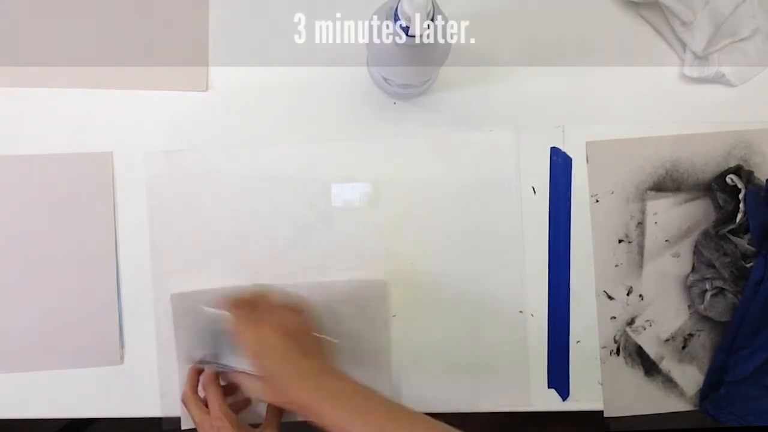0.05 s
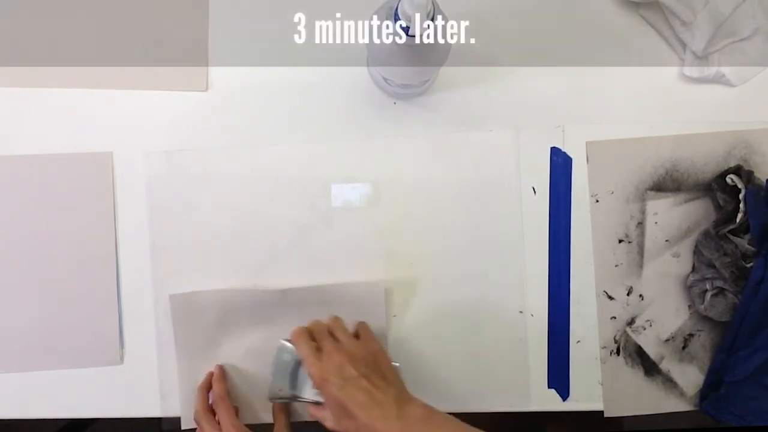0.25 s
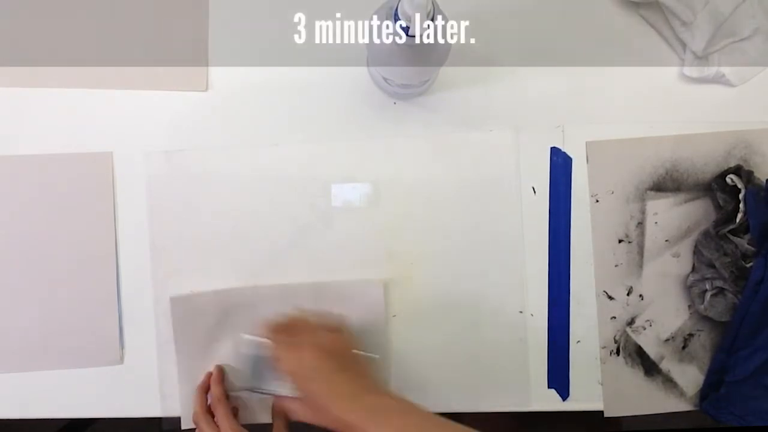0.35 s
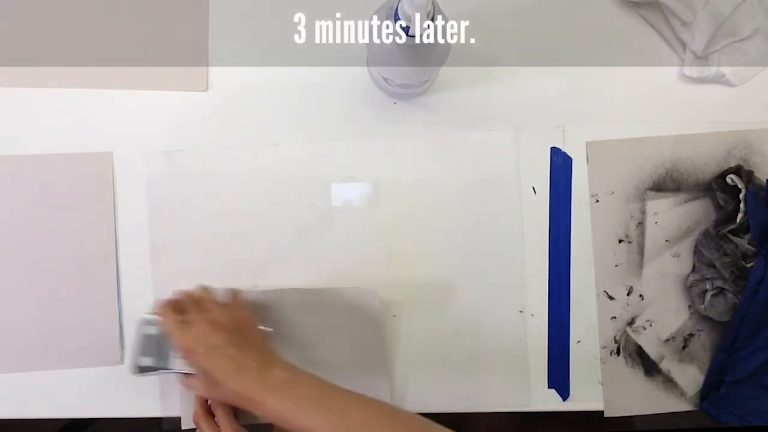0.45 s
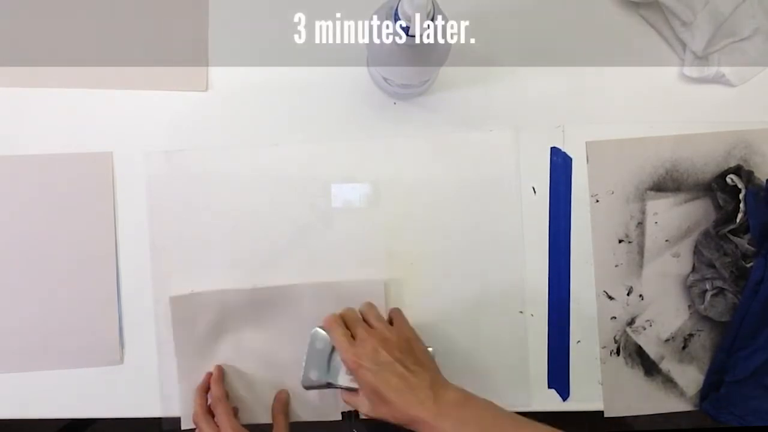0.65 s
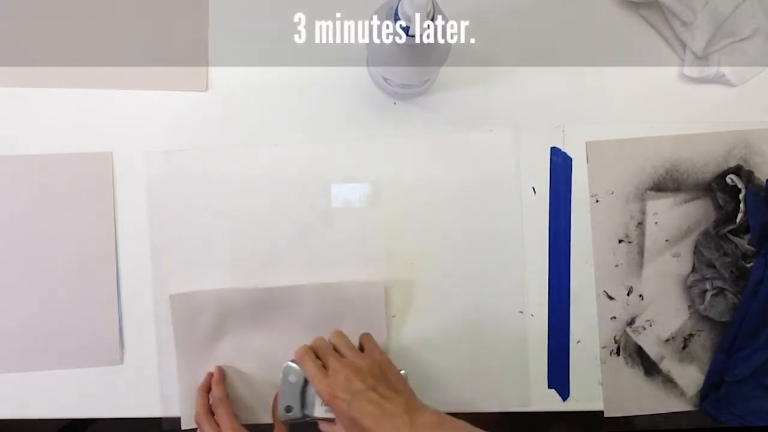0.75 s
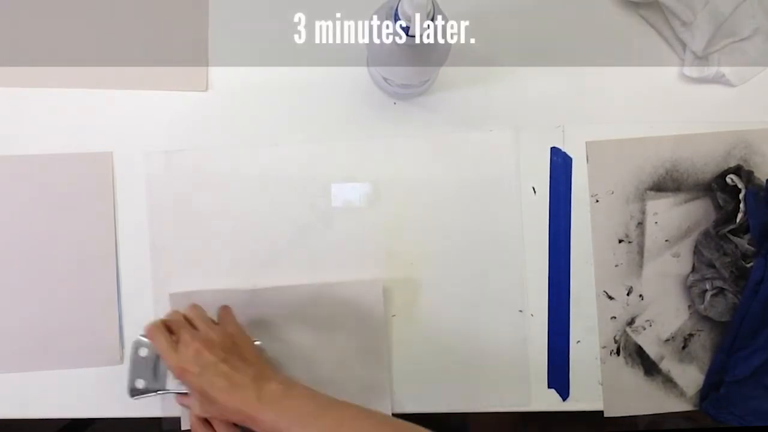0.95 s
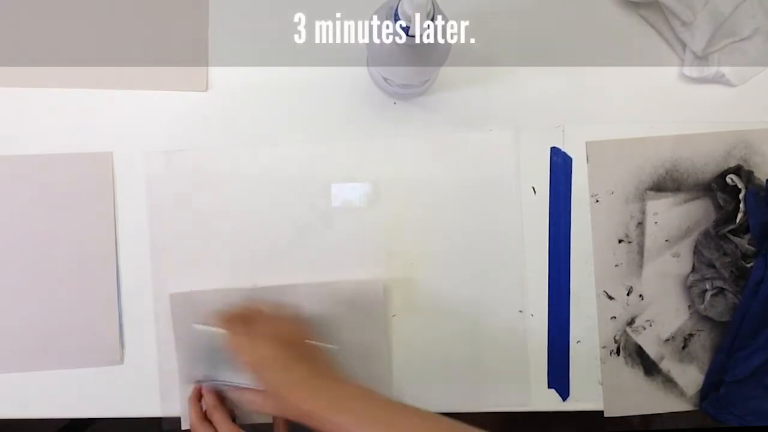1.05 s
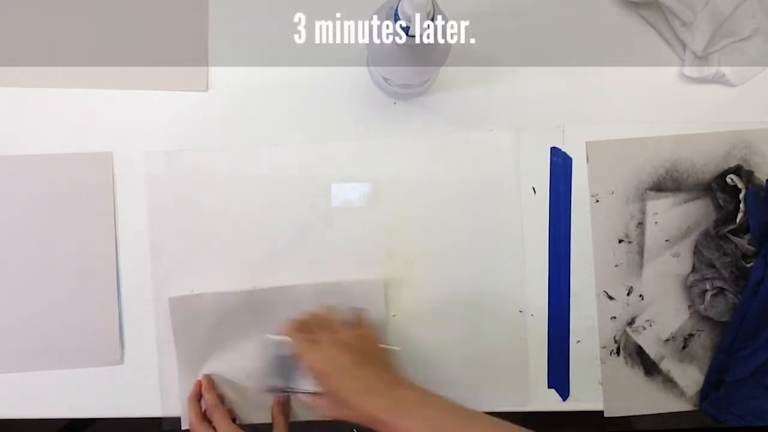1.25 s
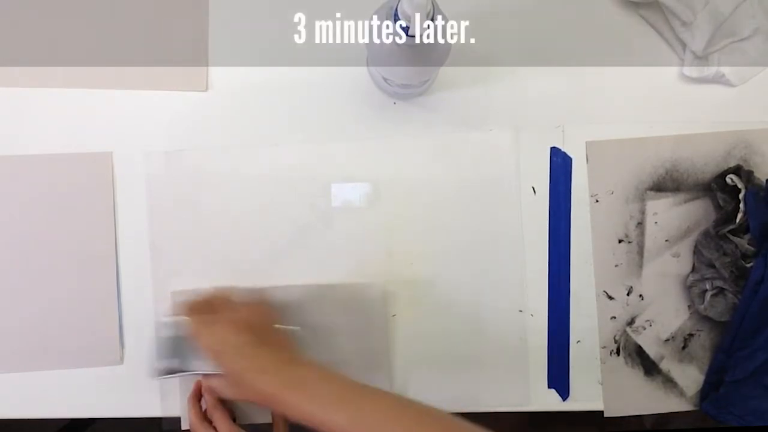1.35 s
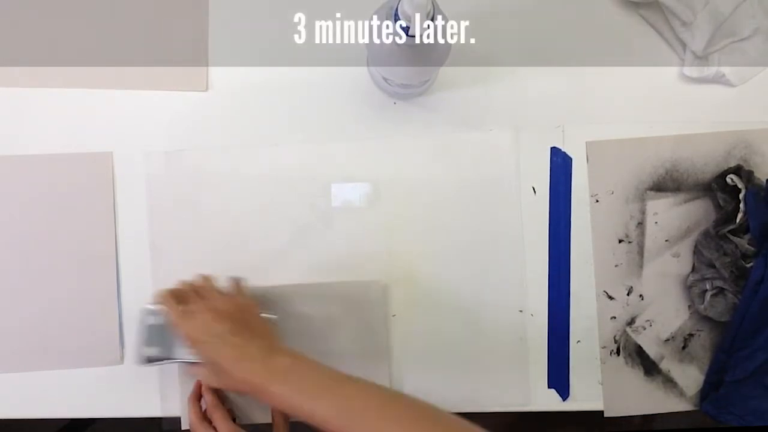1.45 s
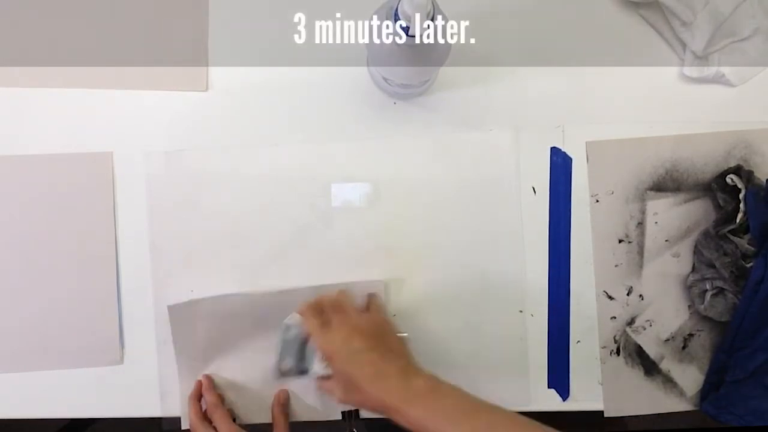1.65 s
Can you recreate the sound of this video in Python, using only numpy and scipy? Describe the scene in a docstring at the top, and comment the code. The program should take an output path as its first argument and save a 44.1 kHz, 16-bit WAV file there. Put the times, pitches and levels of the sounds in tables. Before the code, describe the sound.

A small metal roller rubs rapidly back and forth over paper, rasping and rumbling on the table. It clacks in its loose frame and thumps the table several times, heard close up in a small, dry room.

```python
"""A table in a small, fairly dry room, heard close up through one microphone.
A small metal roller is rubbed quickly back and forth over paper, about fifteen strokes a second.
Each stroke rasps on the paper and rumbles in the table top; now and then the sheet slips or crinkles.
The roller thumps the table and clacks in its loose frame. The hand rests once for a moment."""
import sys
import numpy as np
from scipy import signal
from scipy.fft import rfft, irfft, next_fast_len
from scipy.io import wavfile

SR = 44100
rng = np.random.default_rng(int(sys.argv[2]) if len(sys.argv) > 2 else 0)


def file_out(sig):
    """Save sig as 16-bit WAV at sys.argv[1]."""
    # one column per channel
    cols = np.atleast_2d(sig).T
    # limit, then scale
    lim = np.clip(cols, -1, 1)
    pcm = np.round(lim * 32767).astype(np.int16)
    wavfile.write(sys.argv[1], SR, pcm)


N = 74970
GRAIN_SPREAD_DB, CLATTER_ATTACK_S = 3, 0.00033


def amp(db):
    """Decibels to gain."""
    return 10 ** (np.asarray(db) / 20)


def unit(x):
    """x at rms 1."""
    return x / np.sqrt(np.mean(x ** 2) + 1e-20)


def along(points, hz):
    """Interpolate (frequency, value) points on a log frequency axis."""
    freqs, values = np.transpose(points)
    return np.interp(np.log(hz + 1), np.log(freqs + 1), values)


def filtered(x, response):
    """x through a frequency response."""
    size = next_fast_len(len(x) + SR // 4)
    return irfft(rfft(x, size) * response(np.fft.rfftfreq(size, 1 / SR)), size)[:len(x)]


def coloured(x, spectrum):
    """x shaped by a spectrum, at rms 1."""
    return unit(filtered(x, lambda hz: amp(along(spectrum, hz))))


def fade(t, t60):
    """Exponential decay, 60 dB down at t60."""
    return np.exp(-np.log(1000) * t / t60)


def add(out, start_s, sound):
    """Mix a sound in at start_s."""
    i = max(0, round(start_s * SR))
    out[i:i + len(sound)] += sound[:max(0, len(out) - i)]


def ring(modes, t, attack_s, vary_db=1.5, detune=.004):
    """Struck modes, a little different at each blow, with peak 1."""
    hz, db, t60 = np.transpose(modes)[:, :, None]
    level, pitch = rng.standard_normal((2, len(modes), 1))
    sines = np.sin(2 * np.pi * hz * (1 + detune * pitch) * t)
    ringing = np.sum(amp(db + vary_db * level) * fade(t, t60) * sines, axis=0)
    ringing *= 1 - np.exp(-t / attack_s)
    return ringing / np.abs(ringing).max()


def burst(spectrum, t, t60):
    """Decaying noise for many dense modes; the energy is the same at each blow."""
    envelope = fade(t, t60) * (1 - np.exp(-t / CLATTER_ATTACK_S))
    noise = coloured(rng.standard_normal(len(t)), spectrum)
    return unit(noise * envelope) * np.sqrt(np.mean(envelope ** 2))


# the quiet room's spectrum: (frequency [Hz], relative density [dB])
ROOM_TONE_SPECTRUM = [(20, -10), (100, -9), (170, -2.5), (260, 0), (420, -16.5), (1000, -17), (3000, -18.5),
                      (6000, -28.5), (10000, -31), (15000, -32.5)]


def room_tone():
    """Faint, steady, mostly low noise all around the microphone."""
    return amp(-67) * coloured(rng.standard_normal(N), ROOM_TONE_SPECTRUM)


# the room's decay: (frequency [Hz], t60 [s])
ROOM_DECAY = [(150, 0.14), (2000, 0.12), (5000, 0.14), (12000, 0.14)]


def room_reverb(x, level_db=-15.5, delay_s=.004):
    """The near walls return a short tail, well below the direct sound from the table."""
    hz, t, spectra = signal.stft(rng.standard_normal(SR // 3), SR, nperseg=256)
    tail = signal.istft(spectra * fade(t, along(ROOM_DECAY, hz)[:, None]), SR, nperseg=256)[1]
    tail = np.pad(tail / np.linalg.norm(tail), (round(delay_s * SR), 0))
    return amp(level_db) * signal.fftconvolve(x, tail)[:N]


# slips of the sheet: (time [s], length [s], level [dB])
SLIPS = [(0.474, 0.033, -62.5), (0.524, 0.032, -60), (0.653, .022, -59.5), (0.854, 0.03, -58.5)]
# the paper's hiss, in slips and crinkles: (frequency [Hz], relative density [dB])
PAPER_SPECTRUM = [(2000, -17), (4000, 7.5), (5200, -0.5), (7500, -8.5), (9500, -18.5), (14000, -24)]


def paper_slips():
    """Now and then the sheet slips a little, with a thin grainy hiss."""
    t, level = np.arange(N) / SR, np.zeros(N)
    for start, length, db in SLIPS:
        level += amp(db) * np.sin(np.pi * np.clip((t - start) / length, 0, 1))
    grains = rng.standard_normal(N) * amp(GRAIN_SPREAD_DB * rng.standard_normal(N))
    return level * coloured(grains, PAPER_SPECTRUM)


# creases in the sheet: (time [s], level [dB])
CRINKLES = [(.400, -50.5), (.485, -53), (.541, -50), (0.5618, -46), (0.582, -51.5), (.6548, -43),
            (0.9138, -50.5)]


def paper_crinkles():
    """The sheet creases under the roller with short dry ticks."""
    out, t = np.zeros(N), np.arange(SR // 20) / SR
    for start, db in CRINKLES:
        add(out, start, amp(db) * burst(PAPER_SPECTRUM, t, t60=0.011))
    return out


# bumps on the table: (time [s], level [dB])
THUMPS = [(.057, -44), (0.118, -45), (0.195, -36), (0.2774, -26.5), (0.2837, -30.5), (.291, -32.5),
          (.335, -40), (0.425, -36.5), (0.6686, -40), (0.7844, -30), (0.8354, -40.5), (0.92, -43.5),
          (1.056, -30), (1.0804, -37), (1.305, -43.5), (1.4462, -37.5), (1.514, -47)]
# the table top's modes: (frequency [Hz], relative level [dB], t60 [s])
TABLE_MODES = [(106, -12.5, 0.041), (188.5, -0.5, 0.05), (226, -3, 0.036), (282.6, -0.5, 0.053),
               (423, -3.5, 0.046), (553, -8, 0.015)]
# the table top's rumble, in thumps and strokes: (frequency [Hz], relative density [dB])
RUMBLE_SPECTRUM = [(20, -18), (50, -28), (75, -4.5), (100, -8.5), (130, -4.5), (180, 0), (235, -4),
                   (290, 1.5), (380, -8), (550, -34), (1500, -66)]


def table_thumps():
    """The roller bumps on the table through the paper: a few low modes in a dull thud."""
    out, t = np.zeros(N), np.arange(SR // 5) / SR
    for start, db in THUMPS:
        modes = ring(TABLE_MODES, t, attack_s=.0007)
        thud = amp(-8.5) * burst(RUMBLE_SPECTRUM, t, t60=0.092)
        add(out, start, amp(db) * (modes + thud))
    return out


# the hand's strokes: (time [s], length [s], rasp level [dB], rub level [dB], rumble level [dB])
STROKES = [(-0.02, 0.087, -51.5, -65, -59), (0.079, 0.065, -54, -82, -49), (0.133, 0.1, -55.5, -62.5, -62),
           (0.2, 0.025, -66, -84, -86), (0.28, 0.094, -50.5, -56.5, -55), (0.379, 0.056, -51.5, -70, -49.5),
           (0.433, 0.071, -51.5, -60.5, -54.5), (0.5, 0.084, -48, -61.5, -52.5),
           (0.567, 0.1, -53, -58.5, -57.5), (0.64, 0.078, -50, -59, -55), (0.812, 0.065, -45.5, -57, -53),
           (0.879, 0.058, -53.5, -62, -61), (0.939, 0.064, -52.5, -54.5, -52.5),
           (1.013, 0.06, -51.5, -64, -52.5), (1.069, 0.064, -47, -48, -52),
           (1.137, 0.063, -53.5, -60, -50.5), (1.2, 0.073, -52.5, -53.5, -52),
           (1.272, 0.052, -51, -62, -50), (1.326, 0.076, -53.5, -54.5, -55.5),
           (1.394, 0.084, -55.5, -53.5, -46.5), (1.453, 0.082, -54.5, -57, -52.5),
           (1.533, 0.066, -50.5, -62, -52), (1.595, 0.059, -51, -56.5, -53),
           (1.656, 0.04, -52.5, -58.5, -52.5)]
# the paper fibres' rasp: (frequency [Hz], relative density [dB])
RASP_SPECTRUM = [(700, -7), (1000, -11.5), (1450, -16.5), (1750, 4), (2050, 2), (2400, -5), (2750, -1),
                 (3100, -10.5), (3650, -10.5), (4000, -21.5), (5000, -20.5), (6200, -37), (10000, -36.5),
                 (15000, -55)]
# the sheet's duller rub: (frequency [Hz], relative density [dB])
RUB_SPECTRUM = [(200, 4), (380, -5.5), (580, 3.5), (750, -1.5), (950, -15.5), (1500, -4), (3000, -61)]


def roller_strokes(roundness=0.95, turn_db=-19, grains_per_s=2500, rumble_lag_s=0.0089):
    """The roller speeds up and stops in each stroke: fibres rasp, the sheet rubs, the table rumbles."""
    t, levels = np.arange(N) / SR, np.zeros((3, N))
    for start, length, *dbs in STROKES:
        progress = (t - start) / length
        speed = np.abs(np.sin(np.pi * np.clip(progress, 0, 1))) ** roundness
        spill = amp(turn_db) * np.exp(-(2 * progress - 1) ** 2)  # a little sound lasts through the turn
        levels = np.maximum(levels, amp(dbs)[:, None] * (speed + spill))
    rasp_level, rub_level, rumble_level = levels
    fibres = (rng.random(N) < grains_per_s / SR) * rng.standard_normal(N)
    fibres = unit(fibres * amp(GRAIN_SPREAD_DB * rng.standard_normal(N)))
    contact = fibres + rng.standard_normal(N)  # grains and smooth hiss at equal power
    rasp = rasp_level * coloured(contact, RASP_SPECTRUM)
    rub = rub_level * coloured(rng.standard_normal(N), RUB_SPECTRUM)
    rumble = coloured(rng.standard_normal(N), RUMBLE_SPECTRUM)
    return rasp + rub + np.interp(t - rumble_lag_s, t, rumble_level) * rumble


def contact_tone(x, favoured_hz, limit_hz, boost_db=9, width_octaves=0.11):
    """The point of contact favours one band; a softer contact carries less treble."""
    edges = favoured_hz * 2 ** (width_octaves * np.array([-.5, .5]))
    band = signal.sosfilt(signal.butter(1, edges, "bandpass", fs=SR, output="sos"), x)
    boosted = x + (amp(boost_db) - 1) * band
    return signal.sosfilt(signal.butter(3, limit_hz, fs=SR, output="sos"), boosted)


# metal knocks, levels ahead of the contact's tone: (time [s], roller level [dB], frame level [dB],
# tick level [dB], treble limit [Hz], favoured band [Hz])
CLACKS = [(0.122, -53, -37, -66, 3100, 1920), (0.2233, -31.5, -48, -50, 14000, 2360),
          (0.2284, -34, -29, -36.5, 12900, 3520), (0.2274, -17.5, -27, -39.5, 12600, 2460),
          (0.2816, -15.5, -27.5, -40.5, 10000, 2120), (.2885, -26, -41, -44.5, 10400, 4800),
          (0.3315, -54, -33, -50, 12000, 5500), (0.3347, -56, -29.5, -62, 12800, 3370),
          (0.468, -41, -41.5, -52, 5000, 2650), (.505, -46, -41, -66, 3040, 2700),
          (0.5254, -41, -33, -58, 7000, 1780), (0.6214, -63, -31.5, -42, 2600, 1806),
          (0.68, -68, -43, -40.5, 10600, 8600), (0.6863, -30, -29.5, -40, 10600, 2370),
          (0.699, -36.5, -32.5, -52, 8350, 3350), (0.7869, -26.5, -40, -57, 4000, 2250),
          (0.7916, -30, -36.5, -63, 3600, 2800), (0.8334, -27, -29.5, -45.5, 9000, 1860),
          (0.8366, -35, -25, -35.5, 6400, 2710), (1.4126, -30, -31.5, -50.5, 4170, 1820),
          (1.422, -55, -44.5, -60, 3950, 3600), (1.502, -40.5, -41.5, -81, 2710, 2010),
          (1.665, -42, -36.5, -60, 4170, 2680), (1.6798, -42, -37.5, -66, 2800, 1960),
          (1.6914, -34.5, -39.5, -65, 3000, 1940)]
# modes of the roller and of its frame: (frequency [Hz], relative level [dB], t60 [s])
ROLLER_MODES = [(2175, 2, 0.035), (2272, 11.5, 0.024), (2347, 3.5, .022), (2740, -18, 0.09),
                (3360, -24, 0.12), (4880, -14, 0.059), (4930, -13, 0.12), (5900, -44, 0.032),
                (7750, -37, 0.059), (8800, -32, 0.036)]
FRAME_MODES = [(1730, -15.5, 0.026), (1822, 3.5, 0.019), (1916, 0, 0.028), (1926, -20, 0.022),
               (2547, 0.5, 0.024), (2655, -1, 0.028), (3241, -3.5, 0.028), (3546, -6.5, 0.049),
               (3690, -15.5, 0.089), (5606, -19, 0.063), (5674, -21, 0.038), (7600, -30, 0.056)]
# the frame's clatter and the contact's bright tick: (frequency [Hz], relative density [dB])
CLATTER_SPECTRUM = [(150, -28), (450, -8.5), (900, -12), (1250, -3.5), (1500, -21), (1780, -6), (2150, 3),
                    (2700, -3), (3050, -11), (3600, 3.5), (4050, -27), (4900, -7), (5250, -68), (5600, -48),
                    (6300, -60), (14000, -27)]
TICK_SPECTRUM = [(1500, -33), (3500, 7.5), (5600, 10.5), (6500, -16), (7500, -2), (8100, -6), (9400, 0),
                 (10400, -4), (11000, -21.5), (13000, -17), (15000, -30)]


def roller_clacks():
    """Close by, the roller knocks against its frame: both ring, the frame clatters, the contact ticks."""
    out, t = np.zeros(N), np.arange(SR // 6) / SR
    for start, roller_db, frame_db, tick_db, limit_hz, favoured_hz in CLACKS:
        roller = amp(roller_db) * ring(ROLLER_MODES, t, attack_s=0.00057)
        frame_ring = amp(2.5) * ring(FRAME_MODES, t, CLATTER_ATTACK_S)
        clatter = amp(-7.5) * burst(CLATTER_SPECTRUM, t, t60=0.032)
        tick = amp(tick_db) * burst(TICK_SPECTRUM, t, t60=0.031)
        clack = roller + amp(frame_db) * (frame_ring + clatter) + tick
        add(out, start, contact_tone(clack, favoured_hz, limit_hz))
    return out


def scene():
    """Roller, paper and table in front, the room behind them, in mono."""
    direct = roller_strokes() + roller_clacks() + table_thumps() + paper_slips() + paper_crinkles()
    return (direct + room_reverb(direct) + room_tone())[None]


def record(dry):
    """The microphone thins the deepest bass and passes nothing above its band limit."""
    low_cut_hz, top_hz = 56, 15150
    return filtered(dry[0], lambda hz: 1j * hz / (low_cut_hz + 1j * hz) * (hz < top_hz))[None]


dry = scene()
out = record(dry)
file_out(out)
```